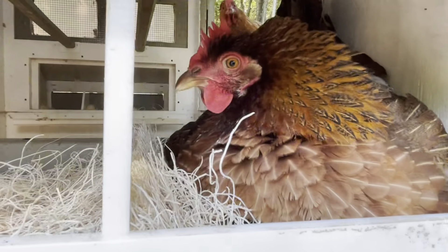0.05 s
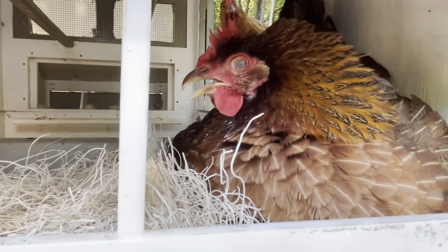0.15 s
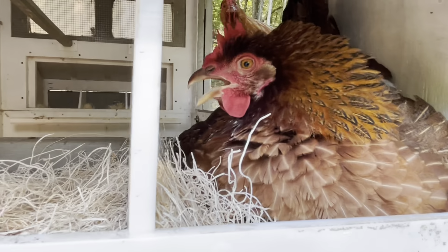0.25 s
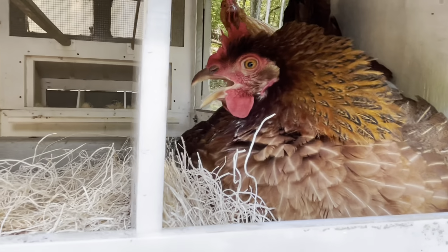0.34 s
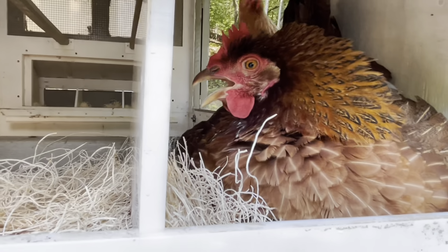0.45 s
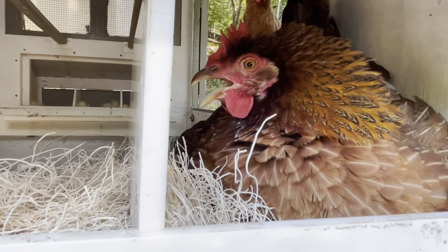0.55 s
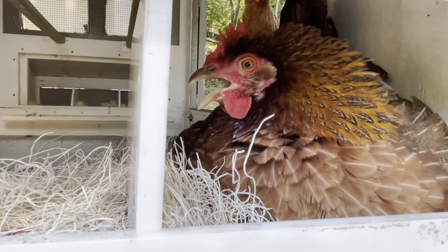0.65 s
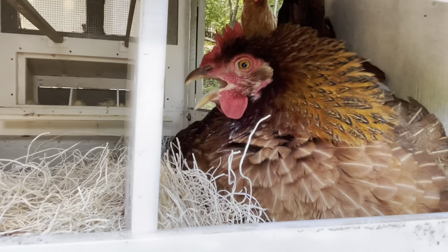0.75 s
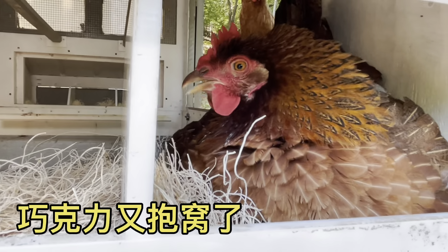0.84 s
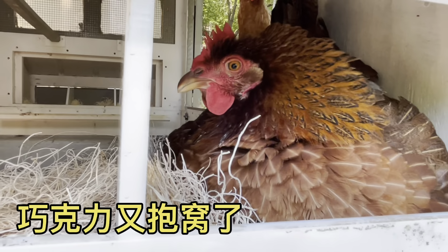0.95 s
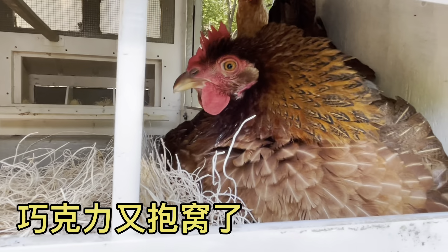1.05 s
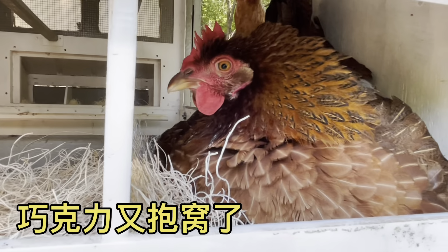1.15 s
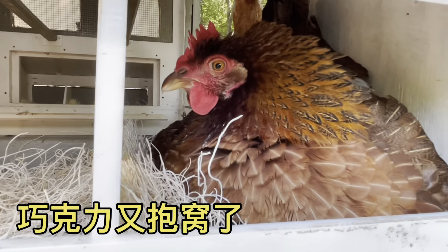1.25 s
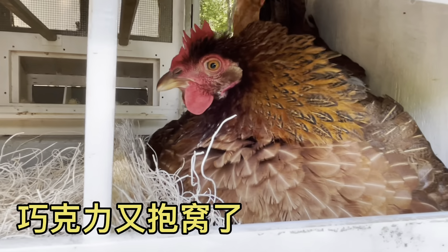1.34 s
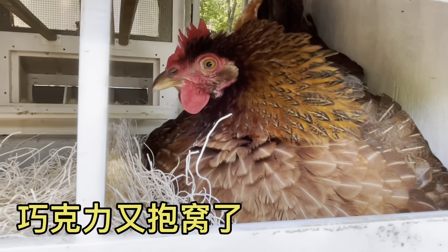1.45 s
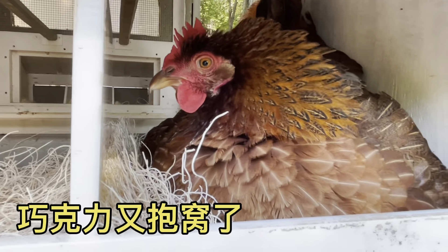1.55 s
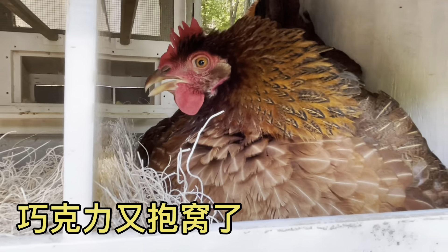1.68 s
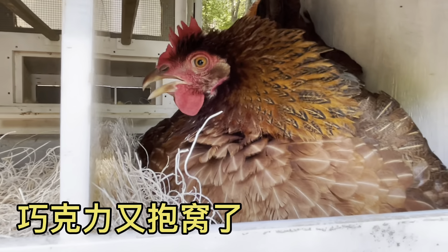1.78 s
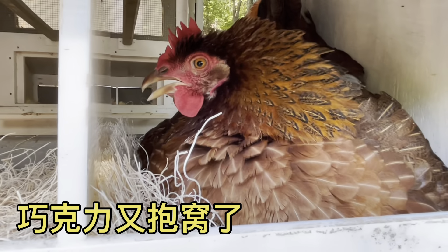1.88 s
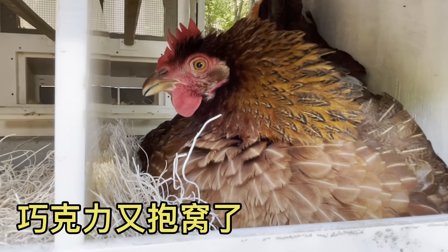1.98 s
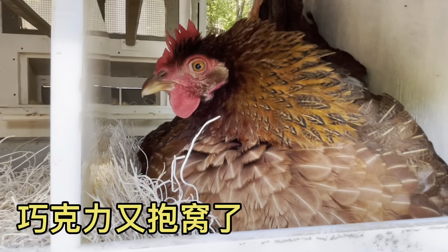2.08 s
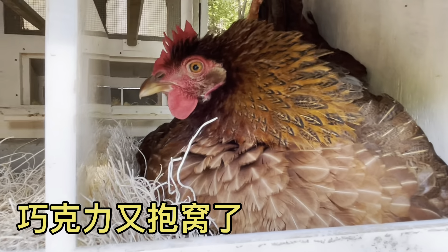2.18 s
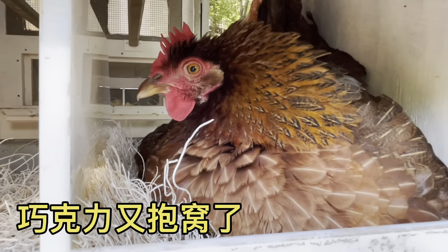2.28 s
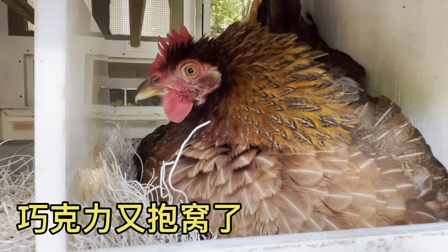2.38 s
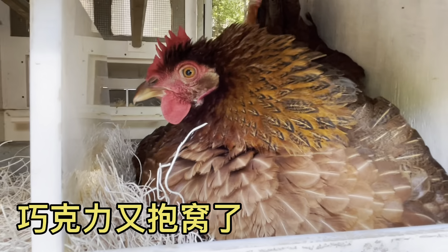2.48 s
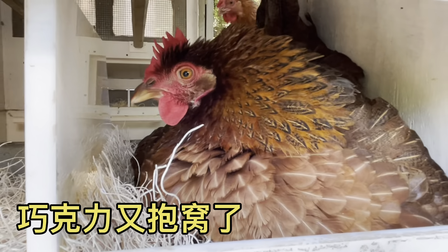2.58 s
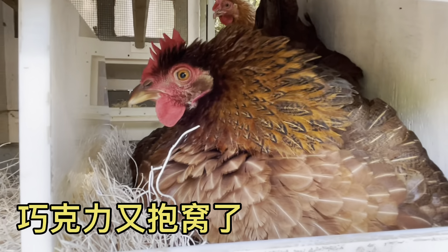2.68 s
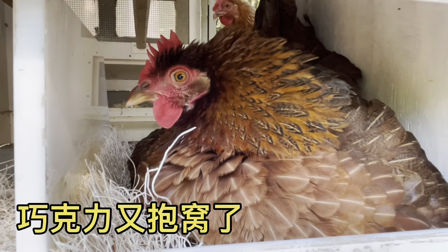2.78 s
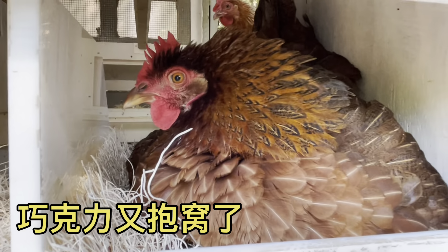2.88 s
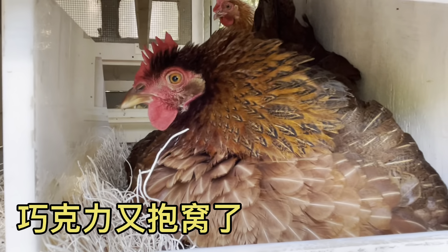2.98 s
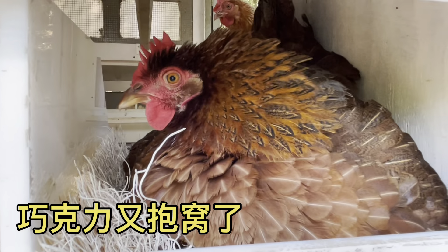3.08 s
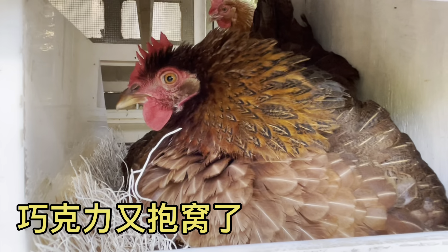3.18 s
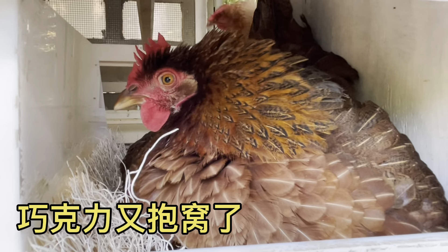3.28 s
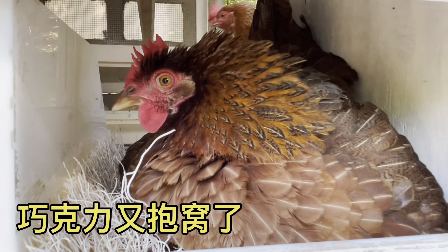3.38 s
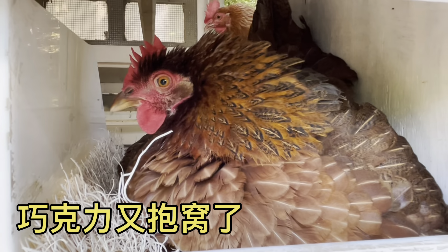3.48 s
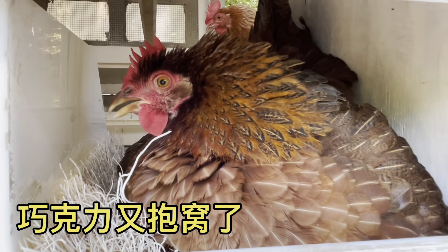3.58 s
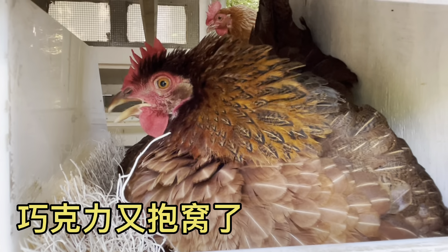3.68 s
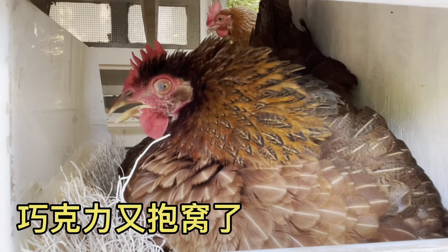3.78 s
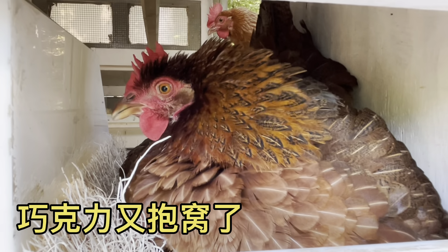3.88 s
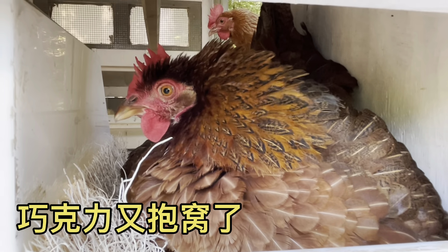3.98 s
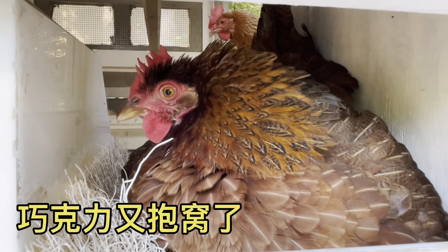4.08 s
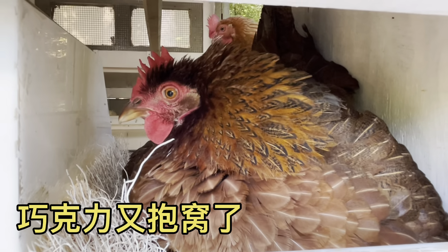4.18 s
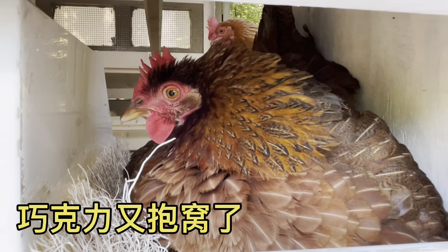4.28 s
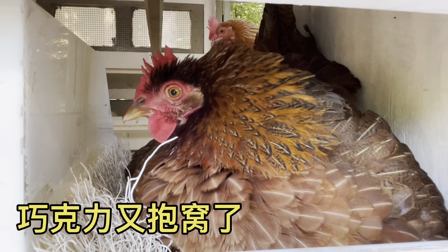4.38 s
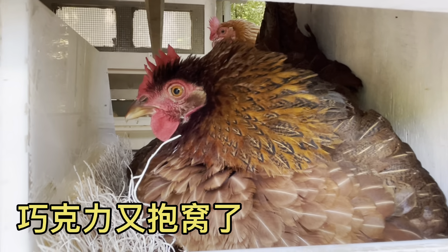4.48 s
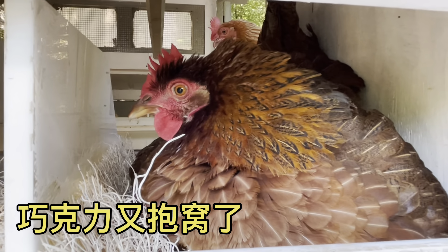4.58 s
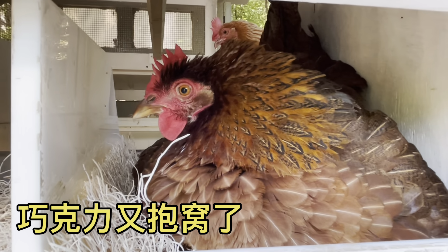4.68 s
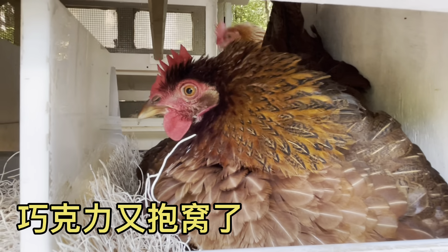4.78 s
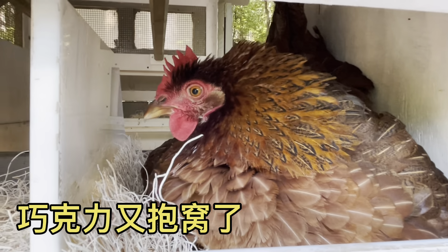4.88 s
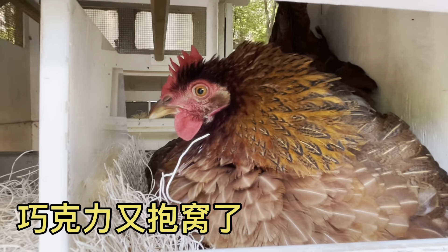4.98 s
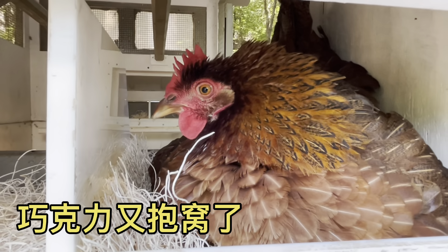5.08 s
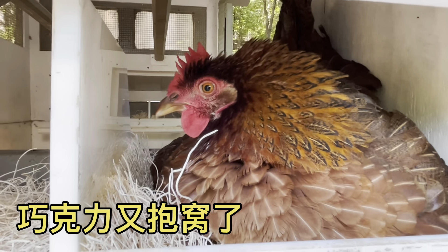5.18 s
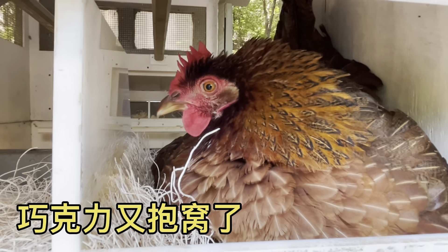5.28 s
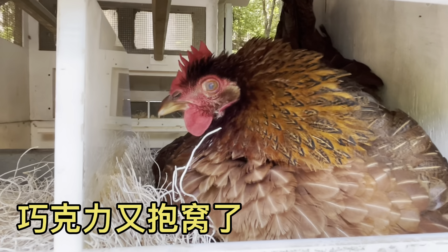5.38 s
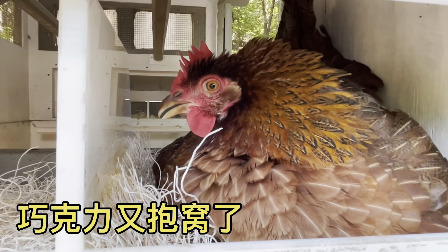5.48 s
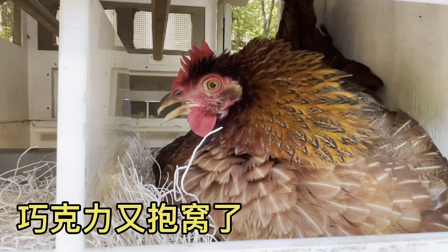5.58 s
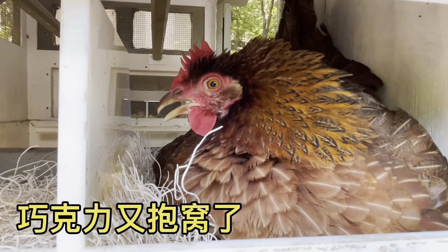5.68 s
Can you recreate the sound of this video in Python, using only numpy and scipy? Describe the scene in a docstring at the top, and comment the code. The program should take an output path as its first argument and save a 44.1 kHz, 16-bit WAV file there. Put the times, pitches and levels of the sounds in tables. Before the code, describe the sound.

A hen close by whines into a harsh rattling squawk, then gives three short low growls over a soft motor hum and outdoor air.

```python
"""A broody hen growls in a wooden nest box while a motor hums nearby, over air, low rumble and faint shrill bands.
A thin whine swells into a harsh swooping squawk; three short rattling growls follow, with silences between.
Each call strings brief syllables, about 45 a second: a nearly pure tone flips between a high and a low register,
with raspy overtones from throat resonances. Straw, made of shaped noise, rustles from the squawk on,
small birds peep faintly as gliding sines, and a stalk snaps with ringing modes before the last growl."""
import sys
import numpy as np
from scipy import signal
from scipy.fft import rfft, irfft, next_fast_len
from scipy.io import wavfile
from scipy.ndimage import uniform_filter1d, map_coordinates

SR = 44100
rng = np.random.default_rng(int(sys.argv[2]) if len(sys.argv) > 2 else 0)


def put_to_file(sound):
    """Save the sound as 16-bit audio at rate SR, in the file named by the first command-line argument."""
    columns = np.atleast_2d(sound).T  # one column per channel
    safe = np.clip(columns, -1, 1)
    whole_steps = np.round(safe * 32767)
    wavfile.write(sys.argv[1], SR, whole_steps.astype(np.int16))


N = 253134   # length in samples
GROWLS_FROM_S = 1.2   # earlier syllables are whine and squawk, later ones growls


def from_db(db):
    """Decibels to gain."""
    return 10 ** (np.asarray(db) / 20)


def rms_one(x):
    """Scale to rms 1."""
    return x / np.sqrt(np.mean(x ** 2) + 1e-20)


def at_hz(points, hz):
    """Read a (frequency, value) table on a log-frequency axis."""
    table_hz, values = np.transpose(points)
    return np.interp(np.log(hz + 1), np.log(table_hz), values)


def at_time(points, t):
    """Read a (time, value) curve at the times t, in seconds."""
    return np.interp(t, *np.transpose(points))


def drift(knots_per_s):
    """Smooth random wander with rms 1: a curve through random knots."""
    knots = rng.standard_normal(N // 8)
    return rms_one(map_coordinates(knots, [np.arange(N) * knots_per_s / SR], order=2, mode="wrap"))


def resonance(x, hz, width_hz):
    """A two-pole resonance with gain 1 on top."""
    r = np.exp(-np.pi * width_hz / SR)
    zeros = np.array([1, 0, -1]) * (1 - r * r) / 2
    poles = [1, -2 * r * np.cos(2 * np.pi * hz / SR), r * r]
    return signal.lfilter(zeros, poles, x + 1e-18)


def moving_resonance(x, hz, width_hz):
    """A resonance whose centre follows a curve: shift down to zero, low-pass, shift back."""
    r = np.exp(-np.pi * width_hz / SR)
    carrier = np.exp(2j * np.pi * np.cumsum(hz) / SR)
    return 2 * np.real(carrier * signal.lfilter([1 - r], [1, -r], x * carrier.conj()))


def butter(x, hz, kind, order=2):
    """A Butterworth filter."""
    return signal.sosfilt(signal.butter(order, hz, kind, fs=SR, output="sos"), x + 1e-18)


def delayed(x, seconds):
    """The same sound, a little later."""
    return np.interp(np.arange(N) - seconds * SR, np.arange(N), x, left=0)


def diffuse_noise(spectrum):
    """Steady stereo noise from all around, rms 1; the two ears' likeness depends on frequency."""
    # left-right correlation: pitch_hz, likeness (-1 to 1, clipped)
    ear_likeness = [(60, 0.79), (140, 0.76), (300, 0.83), (650, -0.2), (1400, -0.29), (3000, 0.22),
                    (7000, 0.34), (9000, -1.103), (10500, -0.4), (12000, 0.95)]
    size = next_fast_len(N)
    hz = np.arange(size // 2 + 1) * SR / size
    mid, side = rfft(rng.standard_normal((2, size))) * from_db(at_hz(spectrum, hz))
    alike = np.clip(at_hz(ear_likeness, hz), -1, 1)
    spectra = np.sqrt(1 + alike) * mid + np.sqrt(1 - alike) * side * [[1], [-1]]
    return rms_one(irfft(spectra, size)[:, :N])


def note(start, length, pitches, edge_s, skew=1, base=0.53, arch=0.62):
    """Samples, arched envelope and curved pitch glide of one note; a skew under 1 peaks early."""
    first = max(int((start - edge_s) * SR), 0)
    at = np.arange(first, min(int((start + length + edge_s) * SR), N))
    t = at / SR - start
    edge = np.clip((np.minimum(t, length - t) + edge_s) / (2 * edge_s), 0, 1)
    u = np.clip(t / length, 0, 1)
    # base is the body level at the edges, arch what it gains in the middle
    envelope = np.sin(np.pi / 2 * edge) ** 2 * (base + arch * np.sin(np.pi * u ** skew))
    glide = np.polyfit([.1, .5, .9], pitches, 2)   # parabola through early, middle and late pitch
    return at, envelope, np.polyval(glide, u)


def nest_box(x, t60, wall_hz):
    """Close walls return a short, dull spray of echoes, different at each ear."""
    t = np.arange(SR // 5) / SR
    echoes = rng.standard_normal((2, len(t))) * from_db(-60 * t / t60) * (t > .002)
    echoes /= np.sqrt(np.sum(echoes ** 2, axis=1, keepdims=True))
    return butter(signal.fftconvolve(x[None], echoes, axes=1)[:, :N], wall_hz, "low")


def yard():
    """Outdoor air and a low rumble are shaped noise; wavering shrill bands are noise through resonances."""
    # spectrum shape of the air: pitch_hz, relative level_db per Hz
    air_shape = [(200, -35), (450, 4), (650, 1.5), (1000, 1.5), (1500, -1), (2000, -3.5), (2650, -5.5),
                 (3400, -6), (4800, -4), (5700, -12), (7500, -12.5), (10000, -9), (13000, -19),
                 (15500, -21.5)]
    # spectrum shape of the rumble: pitch_hz, relative level_db per Hz
    rumble_shape = [(20, -49), (45, -3), (70, 1), (115, -3), (160, 1), (230, -4.5), (330, -8), (480, -41)]
    # shrill bands: pitch_hz, width_hz, left level_db, right level_db (both before the waver)
    shrill_bands = [(2610, 260, -69.5, -66.5), (6553, 480, -62.5, -68)]
    out = from_db(-57.0 + .5 * drift(5.39)) * diffuse_noise(air_shape)
    out += from_db(-55.5 + 2.4 * drift(5.41)) * diffuse_noise(rumble_shape)
    for hz, width, left_db, right_db in shrill_bands:
        band = resonance(resonance(rng.standard_normal((2, N)), hz, width), hz, width)
        out += rms_one(band) * from_db(2.0 * drift(17)) * from_db([[left_db], [right_db]])
    return out


def motor(shaft_hz=48.68, waver=0.002, left_db=1.5, lag_s=0.00076):
    """Lines on multiples of the shaft speed swell and fade slowly; the upper ones arrive from the left."""
    # 2nd order, equal in both ears: time_s, level_db
    second_order = [(0, -51), (1.3, -53), (2.25, -60.5), (3.5, -51), (4.95, -51.5), (5.74, -57)]
    # 4th order, before the left-right tilt: time_s, level_db
    fourth_order = [(0, -56), (.3, -52.5), (1.1, -67), (1.7, -48.5), (2.25, -43), (2.75, -44.5),
                    (3.35, -61), (4.15, -46), (4.849, -45), (5.519, -64), (5.74, -56)]
    # 6th order, before the left-right tilt: time_s, level_db
    sixth_order = [(0, -63), (.3, -66), (.88, -53.5), (1.2, -66.5), (1.85, -56), (2.4, -71), (2.95, -63),
                   (3.741, -54), (4.25, -84), (5.2, -57), (5.74, -77)]
    # weak lines: order (multiple of the shaft speed), relative level_db
    weak_lines = [(5, -69), (8, -70.5), (9, -72), (10, -68.5), (11, -72.5)]
    t = np.arange(N) / SR
    turn = 2 * np.pi * np.cumsum(shaft_hz * (1 + waver * drift(5.44))) / SR

    def line(order, curve):
        return np.sqrt(2) * from_db(at_time(curve, t)) * np.sin(order * turn)

    weak = np.zeros(N)
    for order, db in weak_lines:
        wavering = np.sqrt(2) * from_db(db + 2.0 * drift(1.91))
        weak += wavering * np.sin(order * turn + rng.uniform(0, 2 * np.pi))
    swell = np.exp(-((t - 2.96) / 0.58) ** 2)   # the weak lines swell once, around 2.96 s
    upper = line(4, fourth_order) + line(6, sixth_order) + weak * from_db(-2.5 + 8 * swell)
    return line(2, second_order) + np.array([upper, delayed(upper, lag_s)]) * from_db([[left_db], [-left_db]])


def birds():
    """Thin scooping sine peeps from outside the box, flickering in level, with a short echo."""
    # peeps: start_s, length_s, relative level_db, early pitch_hz, middle pitch_hz, late pitch_hz
    peeps = [(0.904, 0.011, -58, 3400, 2654, 2240), (1.158, 0.015, -63, 2500, 2180, 1800),
             (1.328, 0.062, -64, 2330, 2050, 2300), (1.356, 0.042, -65, 3230, 3050, 3030),
             (1.523, 0.043, -56.5, 2420, 2240, 2420), (2.108, 0.032, -69, 2800, 2860, 2930),
             (2.943, 0.078, -66.5, 2300, 2230, 2290), (5.414, 0.054, -63, 2280, 1996, 2240),
             (5.461, 0.0066, -52.5, 2200, 2310, 2380), (5.623, 0.016, -57, 2500, 2348, 2257)]
    out = np.zeros(N)
    waver = 1 + 0.028 * drift(400)
    for start, length, db, *pitches in peeps:
        at, envelope, hz = note(start, length, pitches, edge_s=0.0053)
        phase = 2 * np.pi * np.cumsum(hz * waver[at]) / SR
        out[at] += np.sqrt(2) * from_db(db) * envelope * np.sin(phase)
    out *= from_db(3.5 * drift(150) + 0.5)
    return out + from_db(-7) * nest_box(out, t60=.1, wall_hz=5000)


def straw(grain_db=1.8):
    """Dry stalks crackle and scratch as grainy noise over a dull brush of the bedding."""
    # straw shifting under the hen: start_s, length_s, crackle level_db, scratch level_db, brush level_db
    rustles = [(0.609, 0.022, -62, -49, -80), (.702, 0.014, -67, -49, -78), (3.288, 0.016, -55, -62, -42.5),
               (3.295, 0.071, -48.5, -56, -52.5), (4.263, 0.017, -63, -51, -78),
               (4.286, 0.024, -64, -51, -87), (4.304, 0.021, -56, -46.5, -80),
               (4.378, 0.053, -48, -55, -84), (4.43, 0.026, -57, -56.5, -79)]
    # fine crackle spectrum: pitch_hz, relative level_db per Hz
    crackle_shape = [(6000, -16), (10300, 12), (12500, -8), (15000, 1.5)]
    # stalk scratch spectrum: pitch_hz, relative level_db per Hz
    scratch_shape = [(1200, -5.5), (3500, -2.5), (5200, 0.5), (7500, -12), (12000, -12)]
    # dull bedding spectrum: pitch_hz, relative level_db per Hz
    brush_shape = [(250, -15), (520, 8), (900, -7), (2500, -16), (5000, -25), (9000, -57)]
    levels = np.zeros((3, N))
    for start, length, *db in rustles:
        at = int(start * SR) + np.arange(int(length * SR))
        early_arch = np.sin(np.pi * np.linspace(0, 1, len(at)) ** 0.49)
        levels[:, at] += from_db(db)[:, None] * early_arch
    crackle, scratch, brush = levels
    grains = rms_one(from_db(grain_db * drift(1200)))
    dry_stalks = crackle * diffuse_noise(crackle_shape) + scratch * diffuse_noise(scratch_shape)
    return grains * dry_stalks + brush * diffuse_noise(brush_shape)


def snap(snap_s=4.3811, peak_db=-31):
    """One dry stalk breaks with a crisp tick: an impulse rings its short modes."""
    # what the stalk rings with: pitch_hz, width_hz, relative level_db
    stalk_modes = [(5350, 350, 6), (7400, 700, 1), (10500, 1500, -9), (13800, 2000, -9)]
    click = np.zeros(N)
    click[int(snap_s * SR)] = 1
    tick = sum(from_db(db) * resonance(click, hz, width) for hz, width, db in stalk_modes)
    return from_db(peak_db) * tick / np.abs(tick).max()


def effort(s):
    """The hen's effort through each call: level, pitch and overtones of the voice at one moment."""
    # whine and squawk: time_s, relative level_db, pitch_hz, overtones relative_db
    squawk_call = [(.16, -44, 1085, -8), (0.177, -39.5, 1035, -14.5), (0.196, -40, 1050, -14),
                   (0.215, -46.5, 1053, -13), (0.253, -37, 1075, -11), (.275, -38.5, 1040, -10),
                   (0.292, -30, 1040, -10), (.314, -33.5, 1075, -21), (0.335, -25.5, 1059, -17),
                   (0.361, -24, 1050, -14.5), (.376, -30, 1000, -14), (.41, -34, 900, -17),
                   (0.439, -20, 900, -19.5), (.475, -24, 900, -13), (.488, -24.5, 900, -6.5),
                   (.5, -27, 900, -17), (.51, -24, 900, -4), (.52, -20, 900, -8.5), (.535, -27, 900, -10),
                   (.57, -22.5, 900, -16), (.605, -26, 900, -13), (.655, -26.5, 900, -14.5),
                   (.74, -30, 900, -14), (.778, -24, 900, -16.5), (.788, -20, 900, -12.5),
                   (.796, -18, 900, -9), (.802, -20, 900, -12)]
    # first short growl, same columns: time_s, relative level_db, pitch_hz, overtones relative_db
    first_growl = [(1.766, -46.5, 1000, -9), (1.786, -39, 1034, 0.5), (1.808, -36, 1025, -2),
                   (1.833, -40, 850, 0), (1.858, -40.5, 850, -4.5), (1.883, -36, 620, -17),
                   (1.91, -52, 576.5, -17), (1.937, -54, 400, -14)]
    # second short growl, same columns: time_s, relative level_db, pitch_hz, overtones relative_db
    second_growl = [(3.54, -41.5, 970, -6), (3.565, -50.5, 990, -6), (3.59, -56, 951, -23),
                    (3.628, -48, 987, -25), (3.647, -44, 1008, -20), (3.67, -37, 1025, -14.5),
                    (3.713, -35.5, 1014, -11), (3.736, -40, 967.6, -16), (3.759, -42, 798, -8),
                    (3.78, -37, 699, -18), (3.807, -37, 654.7, -15.5)]
    # third short growl, same columns: time_s, relative level_db, pitch_hz, overtones relative_db
    third_growl = [(5.434, -48.5, 1027, -14), (5.541, -56, 891.5, -20), (5.581, -42.5, 862, -8.5),
                   (5.619, -38.5, 947, -13), (5.645, -37.5, 961, -15), (5.667, -34.5, 1044, -10.5),
                   (5.688, -34, 1050, -10), (5.71, -32, 1044, -20), (5.732, -31, 1049, -17)]
    times, *columns = np.transpose(squawk_call + first_growl + second_growl + third_growl)
    return [np.interp(s, times, column) for column in columns]


def rattles(scatter=0.014, lone_beat_s=0.024, low_sag=0.184):
    """Runs of arched syllables that slow down as the breath runs out."""
    # runs: middle of first syllable_s, middle of last_s, count, slowing (share),
    # sounding share of each beat, pitch sag at the edges (share)
    runs = [(.16, .333, 10, .02, 0.95, 0.019), (1.7663, 1.9385, 8, 0.16, 0.56, 0.046),
            (3.5428, 3.587, 3, 0.007, 0.81, 0.039), (3.628, 3.7595, 7, .08, 0.58, 0.094),
            (5.433, 5.434, 1, 0, .45, 0.03984), (5.519, 5.7315, 11, .03, 0.62, 0.094)]
    for first, last, count, slowing, share, sag in runs:
        u = np.linspace(0, 1, count)
        beat_s = (last - first) / (count - 1) if count > 1 else lone_beat_s
        length = share * beat_s
        for s in first + (last - first) * (u - slowing * u * (1 - u)):
            db, hz, _ = effort(s)
            hz *= 1 + scatter * rng.standard_normal()
            edge = 1 - (sag if hz > 800 else low_sag)   # the low register arches by its own amount
            yield s - length / 2, length, db, [edge * hz, hz, edge * hz]


def swoops(scatter=0.0081):
    """Each beat of the squawk is a low rising bark that breaks, without a gap, into a higher, sinking cry."""
    # beats: start_s, bark length_s, cry length_s, bark relative level_db, cry relative level_db,
    # bark pitch_hz, cry pitch_hz (both before the scatter)
    squawk_beats = [(0.349, 0.0085, 0.015, -35, -26, 716.4, 1029),
                    (0.371, 0.0095, 0.0099, -25, -23, 787, 1027),
                    (.390, 0.011, 0.012, -22, -35.5, 635, 717),
                    (0.418, 0.0047, 0.013, -29, -25.5, 682, 772.5),
                    (.436, 0.0095, 0.0084, -24, -23.5, 612.4, 1037),
                    (0.454, 0.012, 0.031, -24.5, -23.5, 641.4, 1091),
                    (0.496, .017, 0.0078, -19.5, -32, 697.7, 946),
                    (0.519, 0.01034, 0.0094, -26, -24, 716, 1146),
                    (0.539, 0.01484, .014, -21, -26.5, 679.1, 799.9),
                    (0.568, 0.0089, 0.01206, -23, -30, 602.6, 758.6),
                    (0.591, 0.0087, 0.00904, -24.5, -24.5, 660, 790),
                    (0.608, 0.0148, 0.0097, -21, -39, 677.6, 720.8),
                    (0.637, 0.0041, 0.0084, -27, -32, 700, 803),
                    (0.65, 0.011, 0.0085, -22.5, -25, 760.7, 1109),
                    (0.67, .011, 0.0087, -26.5, -26, 570.3, 1108),
                    (0.692, 0.0139, .013, -25.5, -25, 659.6, 782.6),
                    (0.719, .011, .010, -20.5, -25.5, 611, 1004)]
    # early, middle and late pitch as shares of the listed one
    bark_glide, cry_glide = np.array([.94, 0.94, 1.17]), np.array([1.02, 0.98, .89])
    for s, bark_s, cry_s, bark_db, cry_db, bark_hz, cry_hz in squawk_beats:
        yield s, bark_s, bark_db, bark_hz * bark_glide * (1 + scatter * rng.standard_normal(3))
        yield s + bark_s, cry_s, cry_db, cry_hz * cry_glide * (1 + scatter * rng.standard_normal(3))


def barks(edge_share=0.8):
    """Single arched low barks, mostly where a call ends, that tilt up or down in pitch."""
    # barks: start_s, length_s, relative level_db, middle pitch_hz, rise (share of the pitch)
    single_barks = [(0.746, 0.016, -20.5, 683.3, -0.11), (0.769, 0.016, -21.5, 593, 0.094),
                    (0.7887, 0.018, -19, 574, 0.087), (1.876, 0.013, -32.5, 640, 0.03),
                    (1.907, 0.0079, -36.5, 568.4, -0.18), (1.936, 0.0095, -51, 389, -0.16),
                    (3.754, 0.015, -39.5, 785.4, -0.48), (3.776, 0.0097, -37, 659, 0.73),
                    (3.801, 0.014, -37.5, 660, -0.27), (3.855, 0.00788, -55, 600.5, .1),
                    (5.574, 0.017, -45, 897.7, -0.34), (5.596, 0.0045, -30.5, 669.5, 0.28),
                    (5.639, 0.0034, -37, 583.8, 0.4)]
    for s, length, db, hz, rise in single_barks:
        yield s, length, db, hz * np.array([edge_share - rise / 2, 1, edge_share + rise / 2])


def syllables(shortest_s=.003):
    """All syllables as (start_s, length_s, level_db, three pitches); the even pulsing gives way to the barks."""
    strong = list(barks())
    yield from strong
    yield from swoops()
    for start, length, db, pitches in rattles():
        end = start + length
        for s, held, *_ in strong:
            if s < end and start < s + held:
                # keep the longer piece, before or after the bark
                start, end = (start, s) if s - start > end - s - held else (s + held, end)
        if end - start > shortest_s:
            yield start, end - start, db, pitches


def throat(source, resonances, stretch):
    """Parallel resonances of throat and beak that shift together, scaled to an even overall level."""
    out = np.zeros(len(source))
    for k, (hz, width, db) in enumerate(resonances):
        out += (-1) ** k * from_db(db) * moving_resonance(source, hz * stretch, width)
    out = butter(out, 820, "high", order=4)
    return out / np.std(butter(out, [1800, 3600], "band"))


def syllable_curves(edge_s=0.0015, slur_s=0.002987, flap_lead_s=0.00026):
    """Syllables joined into curves of tone level, overtone level and pitch, plus impulses for the growl flaps."""
    bark_purity = 0.49       # dB of overtones lost for each dB that a syllable stands above the call
    overtone_growth = 0.85   # overtones follow the envelope raised to this power
    level, bright, pitch, weight, openings = np.zeros((5, N))
    for start, length, db, pitches in syllables():
        growling = start > GROWLS_FROM_S
        # squawk notes swell to a late peak; growl pulses strike early, fade and taper more
        shape = dict(skew=0.84, base=.22, arch=1) if growling else dict(skew=1.17)
        at, envelope, hz = note(start, length, pitches, edge_s, **shape)
        excess_db = max(db - effort(start + length / 2)[0], 0)
        overtones = effort(at / SR)[2] - bark_purity * excess_db
        level[at] += envelope * from_db(db)
        bright[at] += envelope ** overtone_growth * from_db(db + overtones)
        pitch[at] += envelope * hz
        weight[at] += envelope
        # the flap comes just before the tone
        openings[int((start - flap_lead_s) * SR)] = from_db(min(db, -32)) * growling
    # the pitch slides from one syllable into the next and rests at 800 Hz in silence
    pitch, weight = uniform_filter1d(np.array([pitch, weight]), int(slur_s * SR))
    pitch = (pitch + 1e-6 * 800) / (weight + 1e-6)
    return level, bright, pitch, openings


def hen(jitter=0.0213, flutter=0.23, rasp=1.0, chest_db=-27, flap_db=-5, overtone_db=-2):
    """The syrinx sounds a tone; each closure adds a sharp pulse and a puff of hiss that ring in the throat."""
    # beak wide open, in the whine and squawk: pitch_hz, width_hz, relative level_db
    open_throat = [(1160, 165, 15.5), (1680, 230, 1), (2210, 110, -17), (2957, 148, 10.5),
                   (3500, 230, -6.5), (3970, 540, -10), (7440, 290, -3.5)]
    # beak nearly shut, in the short growls: pitch_hz, width_hz, relative level_db
    shut_throat = [(1320, 370, 12.5), (1740, 155, 13), (2070, 300, 7.5), (2766, 130, 21), (3100, 160, 0)]
    # roughness of the high register, clean in the whine, hoarser in the growls: time_s, roughness (0-1)
    hoarseness = [(.15, 0.2), (.35, 0.2), (.45, 0.75), (1.8, 0.26), (3.54, 0.68), (3.7, 0.41), (5.6, 0.82)]
    # second tone nearly an octave below the high register: time_s, relative level_db
    undertone = [(.16, -27), (.21, -14), (.24, -9), (.275, -9), (.3, -28), (.46, -37), (.487, -5),
                 (.52, -8), (1.8, -21), (3.54, -10), (3.66, -11), (5.7, -18)]
    # a sinking growl's tone breaks up into gravelly noise: time_s, noisy share (0-1)
    gravel_share = [(.85, 0.05), (1.81, 0.2), (1.835, 0.83), (1.858, 0.96), (1.88, 0.33), (3.54, 0.43),
                    (3.69, 0.11), (3.715, 0.32), (3.737, 0.49), (3.76, 0.64), (3.805, 0.41), (5.6, 0.34),
                    (5.622, .2), (5.645, 0.3), (5.67, 0.15), (5.73, 0.13)]
    # clean octave among the overtones: time_s, relative level_db
    octave_level = [(.16, 5), (.2, 3), (.29, -15), (.35, -16), (.45, -22), (.8, 0), (1.79, -0.5), (1.81, 0),
                    (1.84, -24), (3.54, 2), (3.67, 2), (3.72, -6), (5.6, -12), (5.73, -11)]
    level, bright, pitch, openings = syllable_curves()
    t = np.arange(N) / SR
    high = np.interp(pitch, [750, 1000], [0, 1])   # 0 in the low register, 1 in the high
    # the low register is the rougher one
    rough = 1 - high * (1 - np.clip(at_time(hoarseness, t), 0, 1))
    wander = jitter * rough * drift(600) + 0.01318 * drift(70)
    phase = 2 * np.pi * np.cumsum(pitch * (1 + wander)) / SR

    doubling = high * from_db(at_time(undertone, t))
    tone = np.sin(phase) * (1 + flutter * rough * drift(500)) + doubling * np.sin(.535 * phase)
    # overtones start from harmonics 2-7, with every other pulse stressed where the tone doubles
    closure = sum(np.cos(k * phase) for k in range(2, 8)) * (1 + 2 * doubling * np.cos(phase / 2))
    hiss = rng.standard_normal(N) * (1 + np.cos(phase)) ** 2
    source = rms_one(butter(closure, 5300, "low")) + rasp * rough * rms_one(butter(hiss, 5150, "low"))

    # the resonances rise slightly with the pitch, and sway
    stretch = (pitch / 850) ** 0.038 * (1 + 0.027 * drift(90))
    voiced = np.zeros(N)
    for resonances, when in ((open_throat, t < GROWLS_FROM_S), (shut_throat, t >= GROWLS_FROM_S)):
        at = when & (level > 0)
        voiced[at] = throat(source[at], resonances, stretch[at])
    bright *= from_db(2.5 * drift(130))   # the overtones flicker
    octave = from_db(at_time(octave_level, t)) * np.sin(2 * phase)

    chest = rough * from_db(chest_db) * rms_one(butter(rng.standard_normal(N), [380, 620], "band"))
    noisy = np.clip(at_time(gravel_share, t), 0, 1)
    gravel = rms_one(butter(rng.standard_normal(N), (256, 1050), "band")) / np.sqrt(2)
    # each pulse of a growl opens with one slow, low flap
    flap = resonance(resonance(openings, 390, 470), 390, 470)
    flap *= from_db(flap_db) * openings.max() / np.abs(flap).max()
    body = level * (np.sqrt(1 - noisy ** 2) * tone + noisy * gravel + chest) + flap
    return body, from_db(overtone_db) * bright * (voiced + octave)


def scene(wall_s=0.00174):
    """The hen sits close and to the left: the right ear hears her later, softer and with more side-wall echo."""
    # the nest box's air and panel modes: pitch_hz, width_hz, relative level_db
    box_modes = [(410, 40, -30), (570, 36, -14.5), (698, 90, -4.5), (1045, 55, -9), (1200, 70, -8.5),
                 (1380, 90, -1)]
    tone, overtones = hen()
    left = tone + overtones
    right = from_db(-5.5) * delayed(tone, 0.00029) + from_db(-9.5) * delayed(overtones, 0.000463)
    direct = np.array([left + 0.039 * delayed(left, wall_s), right + .5 * delayed(right, wall_s)])
    ringing = sum(from_db(db) * resonance(left, hz, width) for hz, width, db in box_modes)
    echoes = from_db(-17) * nest_box(left, t60=.08, wall_hz=3500)
    # the box rings at the same moment in both ears, 2 dB stronger at the left
    voice = np.sqrt(2) * direct + ringing * from_db([[1], [-1]]) + echoes
    return voice + motor() + birds() + straw() + snap() + yard()


def record(dry):
    """The top is cut steeply above 15.7 kHz by an elliptic low-pass run forwards and backwards."""
    return signal.sosfiltfilt(signal.ellip(10, .05, 70, 15700, fs=SR, output="sos"), dry)


dry = scene()
out = record(dry)
put_to_file(out)
```